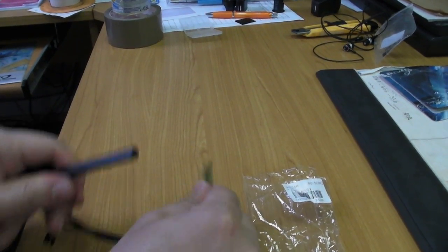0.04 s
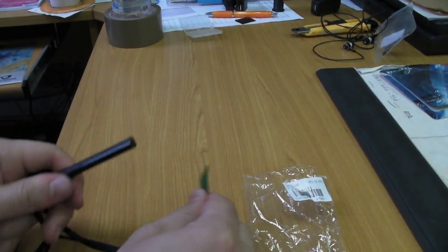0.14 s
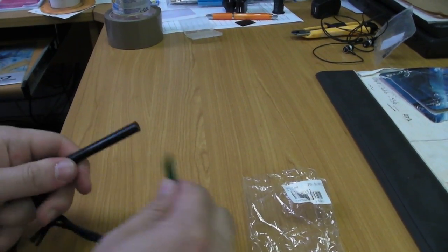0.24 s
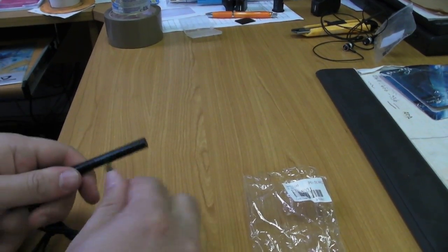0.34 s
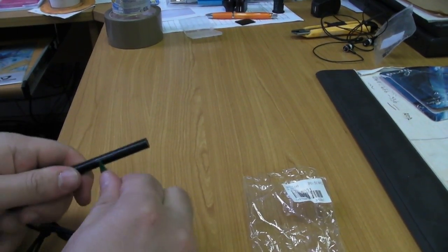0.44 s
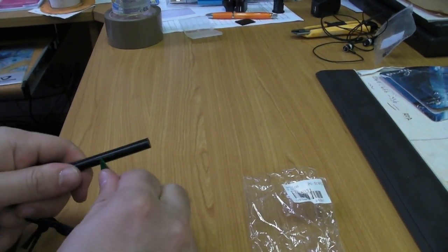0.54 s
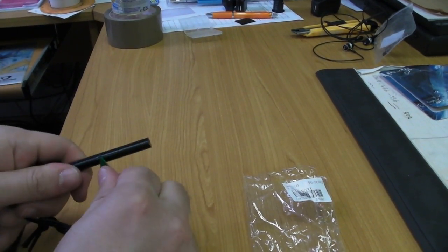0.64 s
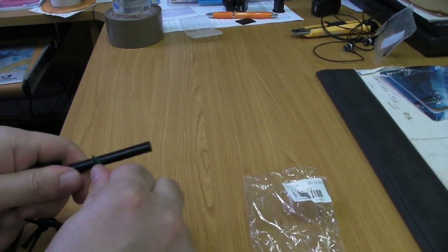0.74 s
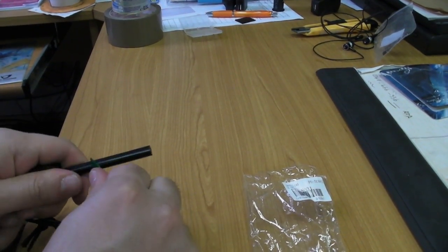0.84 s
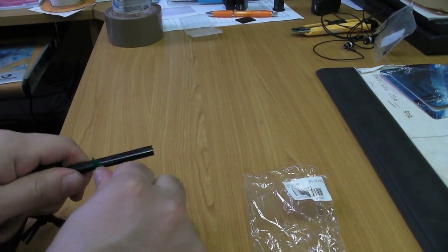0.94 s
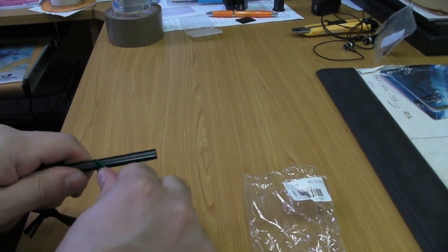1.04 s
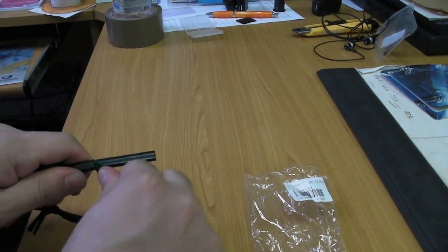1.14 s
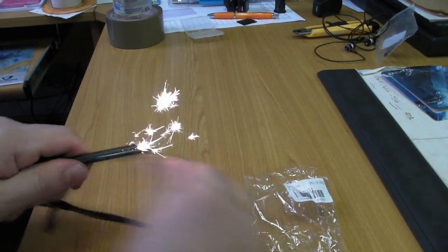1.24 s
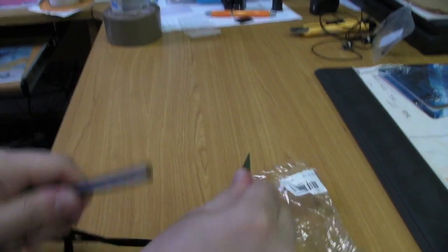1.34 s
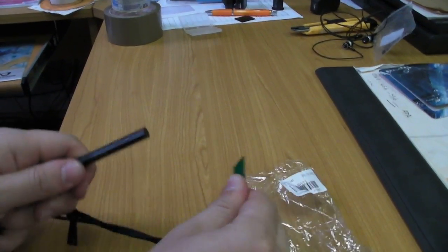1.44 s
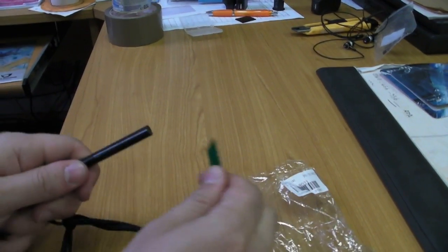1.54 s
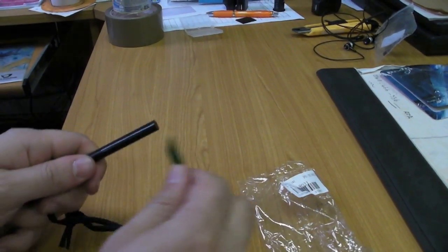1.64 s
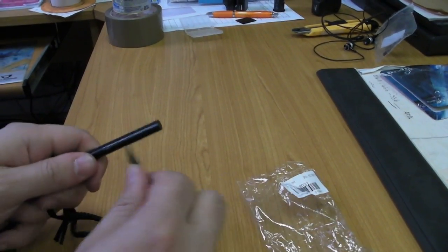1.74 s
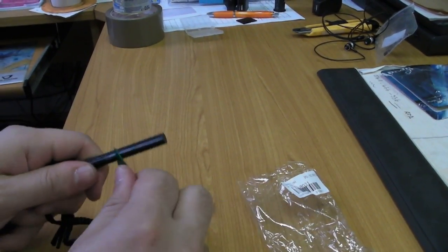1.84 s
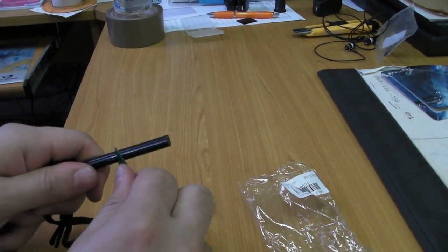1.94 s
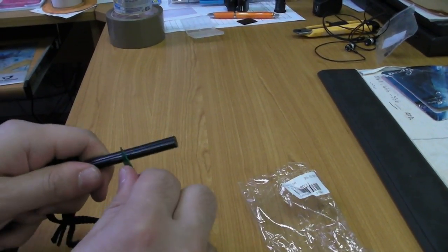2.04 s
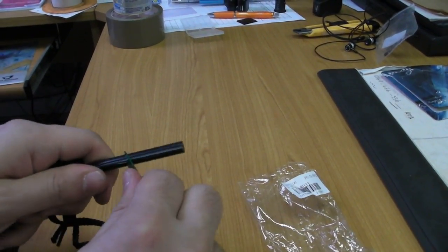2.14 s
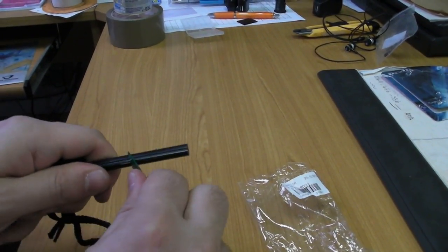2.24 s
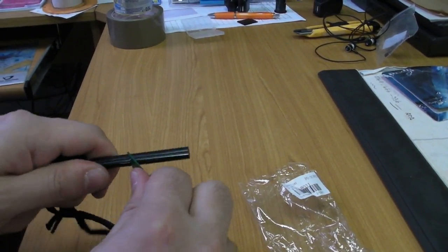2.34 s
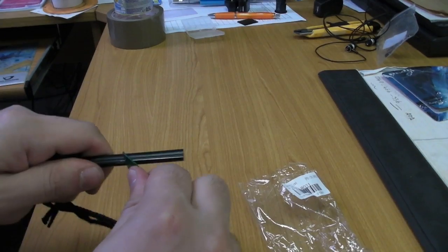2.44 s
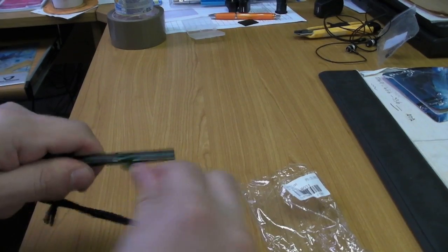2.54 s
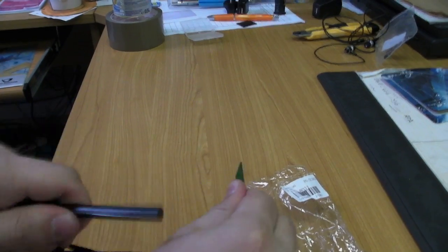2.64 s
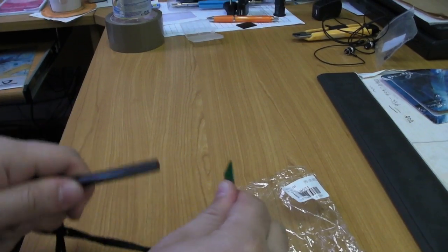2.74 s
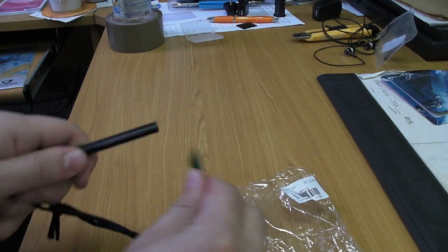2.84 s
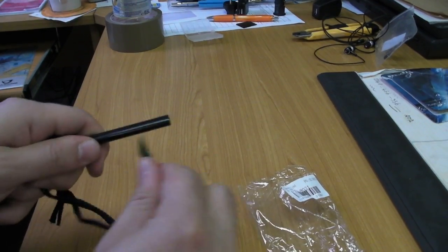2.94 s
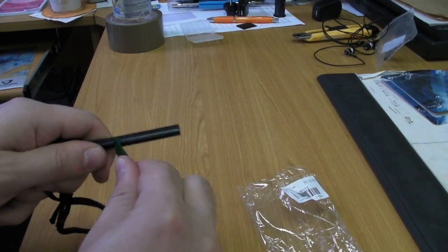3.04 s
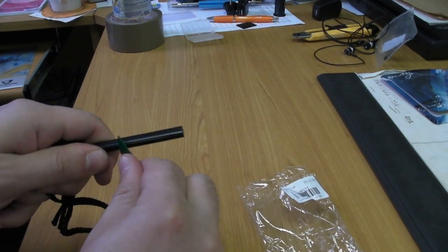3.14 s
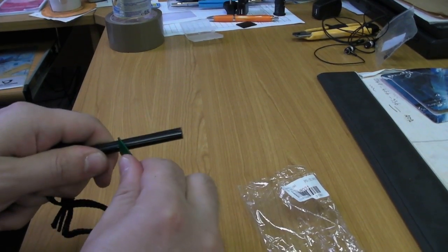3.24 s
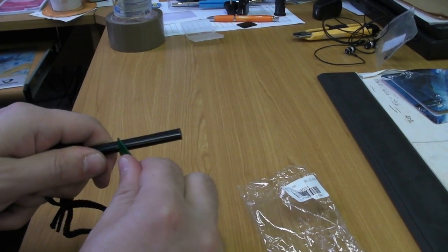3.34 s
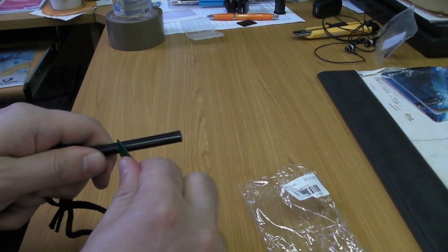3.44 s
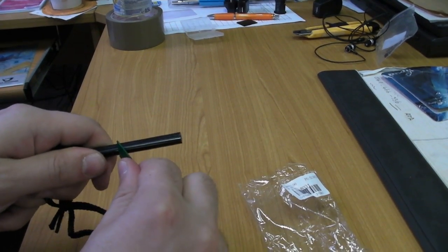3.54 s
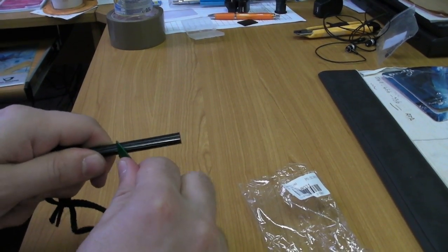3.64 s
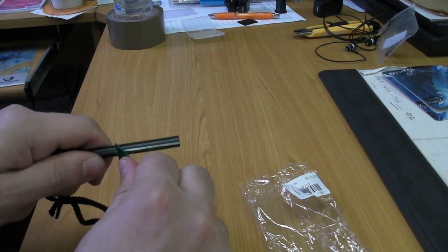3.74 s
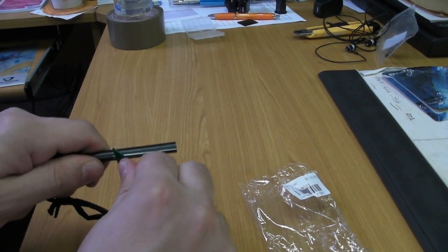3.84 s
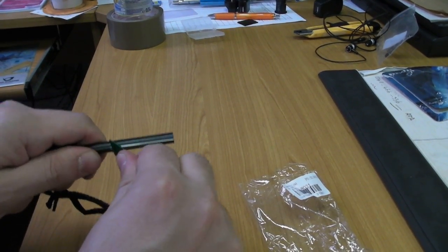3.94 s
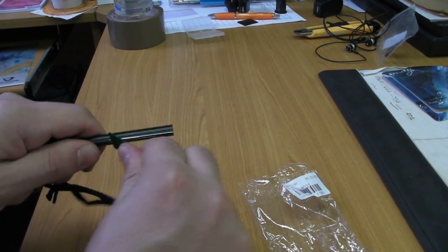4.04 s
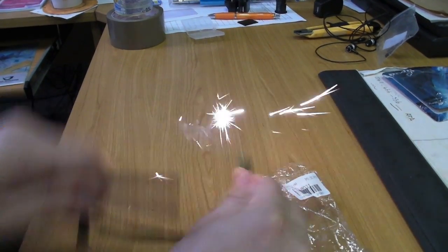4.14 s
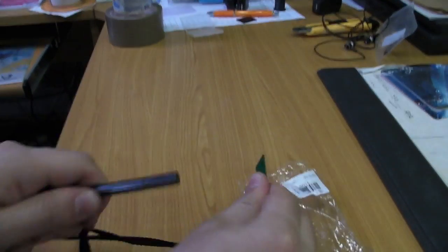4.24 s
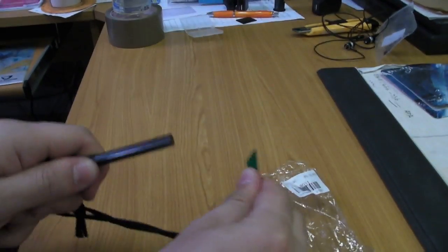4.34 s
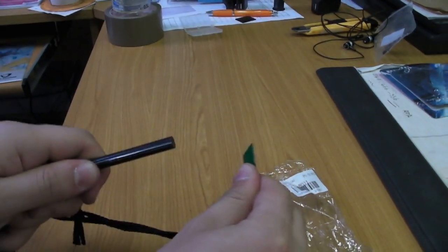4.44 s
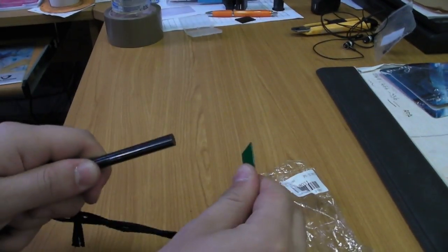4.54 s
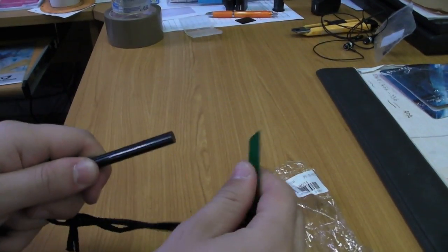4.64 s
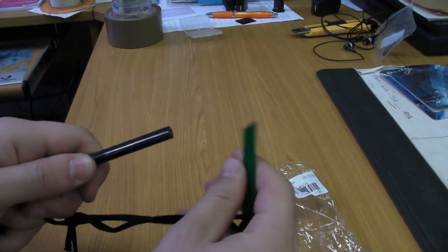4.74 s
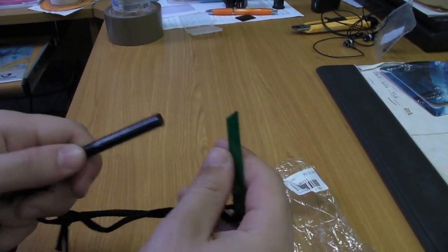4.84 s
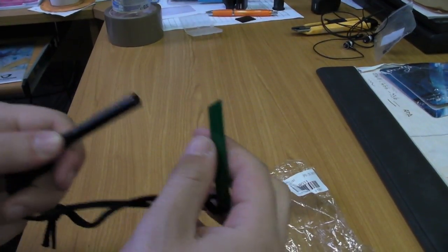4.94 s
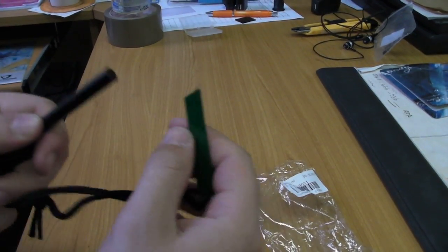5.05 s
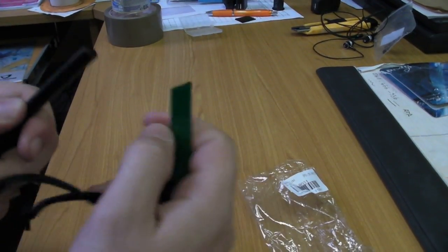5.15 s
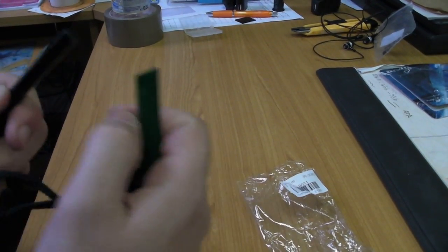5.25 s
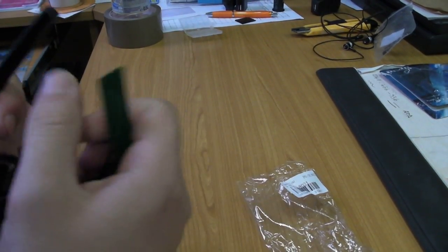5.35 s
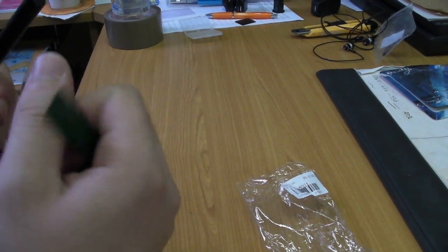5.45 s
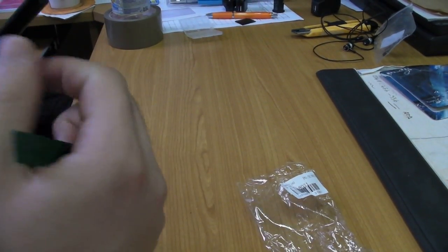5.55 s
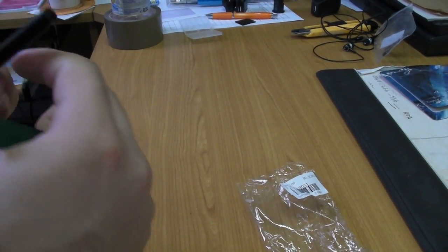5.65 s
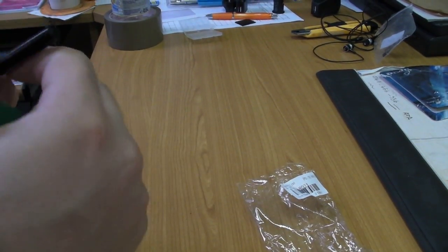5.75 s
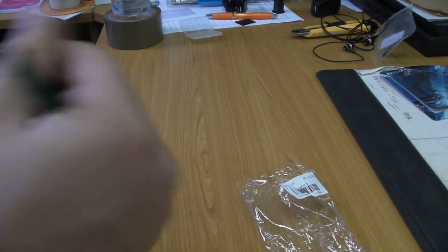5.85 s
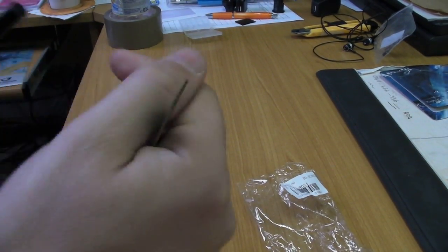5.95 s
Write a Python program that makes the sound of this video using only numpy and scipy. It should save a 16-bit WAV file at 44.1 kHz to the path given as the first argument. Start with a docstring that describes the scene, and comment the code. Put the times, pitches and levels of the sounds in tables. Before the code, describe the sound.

At a desk in a small room, a steel blade rasps a fire-starter rod four times, snapping loudly and fizzing faintly over quiet fan noise.

```python
"""A steel striker is scraped four times along a fire-starter rod over a wooden desk in a small room.
Each stroke is grainy noise coloured by the steel's modes, brightening with speed; a chirped snap,
a flare of sparks, their fading crackle and a soft modal thud of the desk follow.
The blade also ticks and rubs on the rod, a forearm shifts, a hand brushes a plastic bag (shaped noise)
and the bag crinkles once (a chirped click). A fan hums faintly: coloured air noise and three wavering lines."""
import sys
import numpy as np
from scipy import signal
from scipy.fft import rfft, irfft
from scipy.io import wavfile

SR = 44100
rng = np.random.default_rng(int(sys.argv[2]) if len(sys.argv) > 2 else 0)


def digitize_waveform(pressure):
    """Quantize a signal to 16-bit integers and store it at the path in sys.argv[1].

    Rows of a 2-D input are taken as channels; values are limited to [-1, 1].
    """
    field = np.atleast_2d(pressure).T
    bounded = np.clip(field, -1, 1)
    quanta = np.round(bounded * 32767).astype(np.int16)
    wavfile.write(sys.argv[1], SR, quanta)


N = 264159
FREQ_HZ = np.maximum(np.fft.rfftfreq(N, 1 / SR), 1)
SIDES = np.array([[1], [-1]])  # sign of the side signal in left and right

# hard strokes: start_s, end_s (edge leaves the rod), rasp_db, swell_db, squeal_hz, thud_db
STROKES = [(0.065, 0.1013, -22.5, 4.5, 8900, -38), (1.317, 1.348, -21, 8, 4770, -20.5),
           (2.642, 2.6702, -20, 2, 6850, -23.5), (4.182, 4.2154, -22.5, -1, 2270, -27)]
# flare of burning shavings, one per stroke: length_s, level_db, swell_db, tilt_db_per_octave
FLARE_EVENTS = [(0.0081, -24.5, -8, 1), (0.03, -20.5, -9.5, -0.1), (0.022, -30, -10, -1.1),
                (0.027, -19, -24.5, 0.3)]
# spectrum of burning shavings: freq_hz, density_db_per_hz
FLARE_SPECTRUM = [(30, -30), (200, -4.5), (400, 0), (680, 1), (1100, -10), (1750, 1.5), (4000, 0),
                  (5800, -2), (10000, -2), (16000, -8)]
# spectrum of a lightly pressed blade: freq_hz, density_db_per_hz
RUB_SPECTRUM = [(100, -39), (1500, -29), (2500, -0.5), (5200, -4), (7000, -5.5), (10000, -14), (16000, -16)]


def undb(db):
    """Decibels to gain."""
    return 10 ** (np.asarray(db) / 20)


def unit(x):
    """Scale to rms 1."""
    return x / np.sqrt(np.mean(x ** 2))


def colour(x, points, tilt_db=0):
    """Filter by a (Hz, dB) spectrum, tilted in dB per octave about 1024 Hz."""
    octave = np.log2(np.maximum(np.fft.rfftfreq(x.shape[-1], 1 / SR), 10))
    hz, db = np.transpose(points)
    gain_db = np.interp(octave, np.log2(hz), db) + tilt_db * (octave - 10)
    return irfft(rfft(x) * undb(gain_db), x.shape[-1])


def add(out, start_s, x):
    """Mix x into out at start_s."""
    i = int(start_s * SR)
    out[:, i:i + x.shape[-1]] += x[..., :N - i]


def walk(rate_hz):
    """Slow random wandering with rms 1."""
    lowpass = np.exp(-(FREQ_HZ / rate_hz) ** 2)
    return unit(irfft(rfft(rng.standard_normal(N)) * lowpass, N))


def hump(hz, centre_hz, octaves):
    """A bell of gain on the octave scale."""
    return np.exp(-.5 * (np.log2(np.maximum(hz, 1) / centre_hz) / octaves) ** 2)


def modes(table, t):
    """Fading sines of a struck body."""
    return sum(undb(db - 60 * t / t60_s) * np.sin(2 * np.pi * hz * t) for hz, t60_s, db in table)


def grainy_noise(shape, grain_db, most):
    """Noise whose samples get a random boost, alike in all channels: grain_db times a capped exponential draw."""
    boost = np.minimum(rng.exponential(size=shape[-1]), most)
    return rng.standard_normal(shape) * undb(grain_db * boost)


def fan(waver_db=-0.92, drift_rad=0.88):
    """Air noise of gently wavering level plus fan lines of wandering phase."""
    # air noise spectrum: freq_hz, density_db_per_hz
    air_spectrum = [(15, -45), (25, -13), (60, -8), (110, -0.5), (280, -8.5), (520, -8), (750, -11.5),
                    (1500, -12.5), (4100, -15), (4800, -20), (7900, -23.5), (9200, -25.5), (11000, -28.5),
                    (15500, -31)]
    # stereo width of the air: freq_hz, side_minus_mid_db
    air_width = [(60, -5), (110, -8.5), (200, -8), (380, -5.5), (700, -4), (1290, -3.5), (2380, -1.5),
                 (4400, -3.5), (8120, -4), (15000, 2.5)]
    # fan lines: freq_hz, level_db
    hum_lines = [(116, -68.5), (199, -67), (517, -63)]
    air_db = -49.5
    mid, side = (unit(colour(rng.standard_normal(N), air_spectrum)) for _ in range(2))
    air = mid + SIDES * colour(side, air_width)
    t = np.arange(N) / SR
    hum = sum(undb(db) * unit(np.sin(2 * np.pi * hz * t + drift_rad * walk(6.9))) for hz, db in hum_lines)
    return air * undb(air_db + waver_db * walk(1.9)) + hum


def steel(hz, direct=0.27):
    """Frequency response of blade and rod: short, finger-damped modes over a flat direct share."""
    # blade and rod modes: freq_hz, t60_s, level_db
    steel_modes = [(2270, 0.0084, -1), (2705, 0.0063, -3), (4110, 0.0057, -2.5), (4985, 0.0052, 0),
                   (7155, 0.0039, -5.5), (10230, 0.018, -11), (14300, 0.0023, -24)]
    resonances = 0
    for mode_hz, t60_s, db in steel_modes:
        decay_s = t60_s / np.log(1000)
        resonances = resonances + undb(db) / (1 + 1j * (hz - mode_hz) * 2 * np.pi * decay_s)
    return direct + resonances


def fractures(spectrum, grain_db, tilt_db, squeal, squeal_hz, ring=0.21, size=4096):
    """Dense uneven fractures, as grainy noise, ring the steel; the blade's angle favours one narrow band."""
    # stereo width of close sounds: freq_hz, side_minus_mid_db
    close_width = [(100, -17), (1000, -21), (3000, -38), (5000, -20), (8000, -13.5), (13000, -5)]
    hz = np.fft.rfftfreq(size, 1 / SR)
    body = np.abs(steel(hz)) ** ring * (1 + squeal * hump(hz, squeal_hz, 0.089))
    grains = grainy_noise((2, size), grain_db, most=4)
    mid, side = (unit(colour(irfft(rfft(g) * body), spectrum, tilt_db)) for g in grains)
    return mid + SIDES * colour(side, close_width)


def pressure(t, length_s, swell_db, edge_s, bite_s):
    """The edge bites, holds with a swell and lets go."""
    contact = (1 + np.tanh(t / bite_s)) * (1 + np.tanh((length_s - t) / edge_s)) / 4
    return contact * undb(swell_db * (np.clip(t / length_s, 0, 1) - .5))


def scrapes(grain_db=6.5, squeal=0.99, edge_s=0.00091, bite_s=0.00062, skid_hz=4300, size=4096):
    """The edge skids, bites and accelerates evenly: the rasp crossfades from a plain to a brighter colour."""
    # rasp spectrum: freq_hz, density_db_per_hz
    rasp_spectrum = [(100, -20), (1000, -14), (1600, -15.5), (2300, -2), (4300, 0.5), (5800, -1.5),
                     (7000, 0), (10000, -0.5), (13000, -6.5), (16000, -7)]
    slow_tilt_db, fast_tilt_db = 0, 5.5  # per octave
    skid_db, skid_s = -9.5, 0.0067  # against the rasp; rise and fall time constant
    out, t = np.zeros((2, N)), np.arange(size) / SR - .02
    for start_s, end_s, db, swell_db, squeal_hz, _ in STROKES:
        length_s = end_s - start_s
        speed = np.clip(t / length_s, 0, 1)
        slow = fractures(rasp_spectrum, grain_db, slow_tilt_db, squeal, squeal_hz)
        fast = fractures(rasp_spectrum, grain_db, fast_tilt_db, squeal, squeal_hz)
        rasp = np.sqrt(1 - speed) * slow + np.sqrt(speed) * fast
        rasp = rasp * pressure(t, length_s, swell_db, edge_s, bite_s)
        skid = fractures(RUB_SPECTRUM, grain_db, 0, squeal, skid_hz)
        skid = skid * undb(skid_db) * np.exp(-np.abs(t) / skid_s)
        add(out, start_s + t[0], (rasp + skid) * undb(db))
    return out


def room(x, wet_db=-16.5, t60_s=0.32, build_s=0.0006, side_db=-4):
    """Dense reflections of a small furnished room: decaying coloured noise as impulse response."""
    # colour of the reflections: freq_hz, density_db_per_hz
    wall_spectrum = [(60, 10.5), (400, 4.5), (1200, 6.5), (2500, 0.5), (4200, -3), (5500, 5), (7000, 1.5),
                     (10000, 4), (16000, -1)]
    t = np.arange(SR // 2) / SR
    envelope = undb(-60 * t / t60_s) * (1 - np.exp(-t / build_s))
    mid, side = colour(rng.standard_normal((2, len(t))), wall_spectrum) * envelope
    response = (mid + SIDES * side * undb(side_db)) / np.sqrt(np.sum(mid ** 2))
    mono = x.mean(axis=0)[None]
    return undb(wet_db) * signal.fftconvolve(mono, response, axes=1)[:, :N]


def grind(rows, spectrum, grain_db, squeal, edge_s, bite_s, size=4096):
    """Short bursts of fractures, each of one steady colour."""
    out, t = np.zeros((2, N)), np.arange(size) / SR - .02
    for start_s, length_s, db, swell_db, tilt_db, squeal_hz in rows:
        burst = fractures(spectrum, grain_db, tilt_db, squeal, squeal_hz)
        burst = burst * pressure(t, length_s, swell_db, edge_s, bite_s)
        add(out, start_s + t[0], burst * undb(db))
    return out


def flares():
    """Shavings catch fire just before the edge leaves the rod: short bursts of grainy noise."""
    lead_s, strongest_hz = .003, 4300
    rows = [(end_s - lead_s, *flare, strongest_hz)
            for (_, end_s, *_), flare in zip(STROKES, FLARE_EVENTS)]
    return grind(rows, FLARE_SPECTRUM, grain_db=2.0, squeal=0.96, edge_s=0.0041, bite_s=0.0043)


def knocks(rows, skirt_db, lag_s, echo=0.2, size=2048):
    """Single clicks: bending waves run faster at high pitch, so each is a tiny falling chirp."""
    out, hz = np.zeros((2, N)), np.fft.rfftfreq(size, 1 / SR)
    travel = np.exp(-4j * np.pi * lag_s * np.sqrt(hz * 1000))  # delay is lag_s at 1 kHz
    skirt = undb(skirt_db) * hump(hz, 5200, 1.2)
    for peak_s, db, centre_hz, octaves, *_ in rows:
        # the wave comes back from the rod's end three cycles of centre_hz later
        rebound = 1 + echo * np.exp(-6j * np.pi * hz / centre_hz)
        click = irfft(steel(hz) * (hump(hz, centre_hz, octaves) + skirt) * travel * rebound)
        magnitude = np.abs(click)
        add(out, peak_s - magnitude.argmax() / SR, click * undb(db) / magnitude.max())
    return out


def recoil(rows, ring_t60_s=0.31, ring_octaves=0.35):
    """After a snap the rod kicks in the fingers with a dull modal knock, and a metallic noise-band ring fades."""
    # rod rocking in the fingers: freq_hz, t60_s, level_db
    sway_modes = [(396, 0.024, -7), (610, 0.011, -1)]
    out, t = np.zeros((2, N)), np.arange(SR // 2) / SR
    hz = np.fft.rfftfreq(len(t), 1 / SR)
    for start_s, _, centre_hz, _, recoil_db, ring_db in rows:
        noise = rng.standard_normal(len(t))
        ring = unit(irfft(rfft(noise) * hump(hz, centre_hz, ring_octaves)))
        ring = ring * undb(ring_db - 60 * t / ring_t60_s)
        add(out, start_s, modes(sway_modes, t) * undb(recoil_db) + ring)
    return out


def snaps():
    """The edge jumps off the rod's end: a chirped click, then the recoil."""
    # one per stroke: peak_db, centre_hz, spread_octaves, recoil_db, ring_db
    snap_events = [(1.5, 4400, 0.25, -20, -34.5), (-3, 3690, 1.22, -14, -29), (-3.5, 6600, 1.5, -14.5, -58),
                   (-4.5, 2800, 0.71, -14.5, -50)]
    rows = [(end_s, *snap) for (_, end_s, *_), snap in zip(STROKES, snap_events)]
    return knocks(rows, skirt_db=-3, lag_s=.003) + recoil(rows)


def sparks(fizz_db=-23, t60_s=0.75, grain_db=6, tilt_db=-.8):
    """Shavings fly on and crackle out as fading grainy noise, louder after a louder flare."""
    out, t = np.zeros((2, N)), np.arange(SR // 2) / SR
    for (_, end_s, *_), (_, flare_db, *_) in zip(STROKES, FLARE_EVENTS):
        pops = grainy_noise((len(t),), grain_db, most=5)
        fizz = unit(colour(pops, FLARE_SPECTRUM, tilt_db))
        add(out, end_s, fizz * undb(flare_db + fizz_db - 60 * t / t60_s))
    return out


def thuds(rattle=1.0, rattle_s=0.017, clutter_db=-19, clutter_t60_s=0.24):
    """The hands jolt the desk's modes with a soft, slightly rough push, and the things on it rumble."""
    # desk top modes: freq_hz, t60_s, level_db
    desk_modes = [(48, 0.16, -3.5), (113.6, 0.2, 4.5), (386, 0.21, 1), (590, .14, -22)]
    # loose rattle of the things on the desk: freq_hz, density_db_per_hz
    clutter_spectrum = [(20, -20), (45, 3), (70, 0), (110, -8), (170, -4), (350, -6), (600, -17),
                        (1200, -26), (4000, -50)]
    lag_s, push_s = .018, 0.0055  # follow-through of the hand after the snap; length of its push
    out, t = np.zeros((2, N)), np.arange(SR // 2) / SR
    rise = np.minimum(t / push_s, 1)
    for _, end_s, *_, db in STROKES:
        roughness = rattle * np.exp(-t / rattle_s) * rng.standard_normal(len(t))
        push = np.sin(np.pi * rise) + roughness
        thud = signal.fftconvolve(push, modes(desk_modes, t))[:len(t)]
        clutter = unit(colour(rng.standard_normal(len(t)), clutter_spectrum))
        clutter = clutter * undb(clutter_db - 60 * t / clutter_t60_s) * rise
        add(out, end_s + lag_s, (thud / np.abs(thud).max() + clutter) * undb(db))
    return out


def ticks():
    """The blade touches or catches on the rod, and the plastic bag crinkles once: chirps with a strong rebound."""
    # blade ticks and, at 1.565 s, the bag's crinkle: peak_s, peak_db, centre_hz, spread_octaves
    tick_events = [(.4955, -13.5, 4820, 0.33), (.5263, -9.5, 4000, .71), (.5576, -27, 4670, 0.51),
                   (.6952, -16.5, 4820, 0.41), (.8154, -22, 3560, 0.39), (.8444, -30, 2900, 0.7),
                   (1.1187, -29, 4980, .27), (1.368, -7, 4500, 1.4), (1.565, -32, 4550, 1.5),
                   (1.9743, -26, 4620, 0.48), (2.1308, -29.5, 4700, 0.21), (2.1728, -32, 4890, 0.29),
                   (2.1908, -32, 5270, 0.19), (2.207, -33, 5240, .23), (2.6579, -9, 2600, 0.49),
                   (2.860, -33, 4530, 1.8), (3.1642, -8.5, 5600, 0.22), (4.1575, -26, 2400, .5),
                   (4.1677, -13, 2280, 0.57), (4.1747, -22, 2240, 0.34), (4.2022, -4.5, 3120, 0.42),
                   (4.237, -15, 2200, 0.71), (4.461, -34, 4530, 1.8), (5.2538, -29.5, 9350, 2.2),
                   (5.9475, -31, 4000, .62)]
    return knocks(tick_events, skirt_db=-11.5, lag_s=.003, echo=.5)


def rubs():
    """The blade slides lightly on the rod: quiet bursts of fractures."""
    # light rubs: start_s, length_s, level_db, swell_db, tilt_db_per_octave, squeal_hz
    rub_events = [(.690, 0.0042, -28.5, 1, -4.5, 5070), (.824, 0.037, -44.5, -3.5, -5, 5140),
                  (1.975, 0.013, -44, -7, 0, 4860), (3.209, .018, -47, 3, -4, 5300),
                  (3.227, .016, -38, -3, -1, 5440), (5.89, .062, -48.5, 4.5, 1, 10000)]
    return grind(rub_events, RUB_SPECTRUM, grain_db=4.0, squeal=2.2, edge_s=0.0021, bite_s=0.0011)


def rustle(event, spectrum, grain_db):
    """A soft, grainy slide that swells and fades as a half sine."""
    start_s, length_s, db = event
    grains = grainy_noise((N,), grain_db, most=6)
    progress = np.clip((np.arange(N) / SR - start_s) / length_s, 0, 1)
    return unit(colour(grains, spectrum)) * np.sin(np.pi * progress) * undb(db)


def forearm_shift():
    """A forearm shifts on the desk: a low, smooth rustle."""
    # one slide: start_s, length_s, level_db
    shift_event = (0.826, 0.18, -51.5)
    # forearm on wood: freq_hz, density_db_per_hz
    arm_spectrum = [(20, -28), (50, -11), (78, 5), (120, -14), (400, -42), (4000, -70)]
    return rustle(shift_event, arm_spectrum, grain_db=1)


def bag_brush():
    """A hand brushes a plastic bag: a broadband, grainier rustle."""
    # one slide: start_s, length_s, level_db
    brush_event = (1.32, 0.57, -51)
    # plastic bag: freq_hz, density_db_per_hz
    bag_spectrum = [(100, -1), (800, -1.5), (1500, -4), (4500, -3), (7000, -15.5), (16000, -22)]
    return rustle(brush_event, bag_spectrum, grain_db=4)


def microphone_pair(heard):
    """The two microphones differ in colour; each takes half the difference."""
    # channel balance: freq_hz, left_minus_right_db
    left_lead = [(100, -0.5), (8000, 0.16), (10000, 0), (13000, 1), (16000, 1)]
    left, right = ([(hz, sign * db / 2) for hz, db in left_lead] for sign in (1, -1))
    return np.array([colour(heard[0], left), colour(heard[1], right)])


def scene():
    """All the handwork, its room and the fan."""
    chatter = undb(1.1 * walk(270))  # the edge grips and slips unevenly
    grinding = (scrapes() + flares() + rubs()) * chatter
    handling = forearm_shift() + bag_brush()
    close = grinding + snaps() + sparks() + thuds() + ticks() + handling
    return microphone_pair(close + room(close) + fan())


def record(dry, notch_hz=7850, notch_width_hz=700, low_hz=25, top_hz=16000):
    """The microphone sheds the deepest bass, has a narrow treble notch, clips at full scale and cuts the top."""
    lean = signal.sosfilt(signal.butter(2, low_hz, "high", fs=SR, output="sos"), dry)
    notched = signal.lfilter(*signal.iirnotch(notch_hz, notch_hz / notch_width_hz, fs=SR), lean)
    clipped = np.clip(notched, -1, 1)
    return signal.sosfilt(signal.ellip(10, .2, 70, top_hz, fs=SR, output="sos"), clipped)


dry = scene()
out = record(dry)
digitize_waveform(out)
```